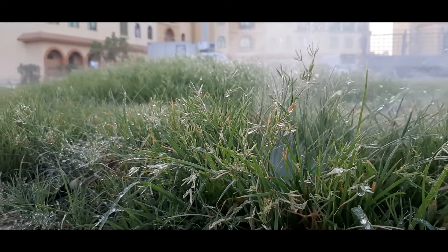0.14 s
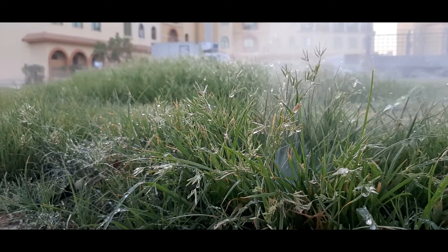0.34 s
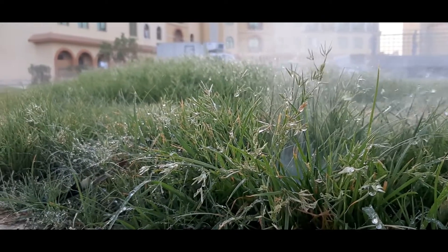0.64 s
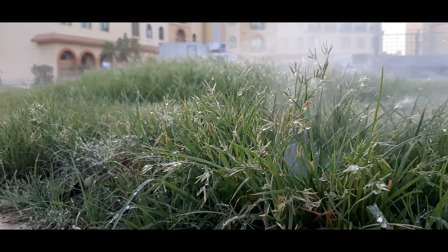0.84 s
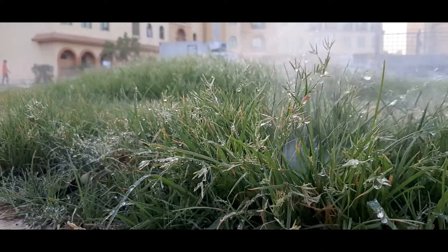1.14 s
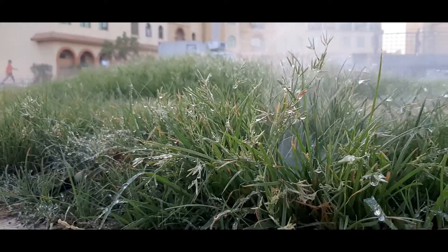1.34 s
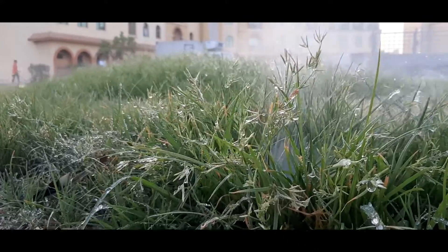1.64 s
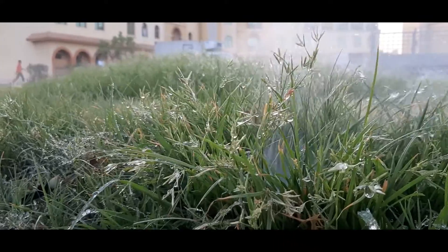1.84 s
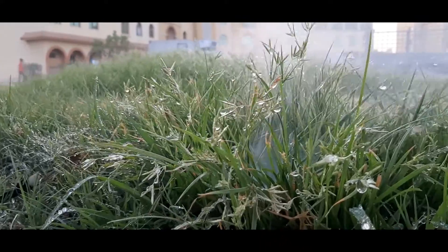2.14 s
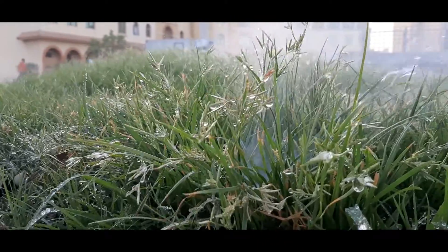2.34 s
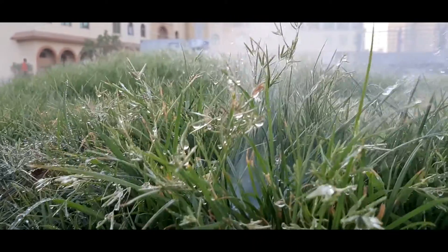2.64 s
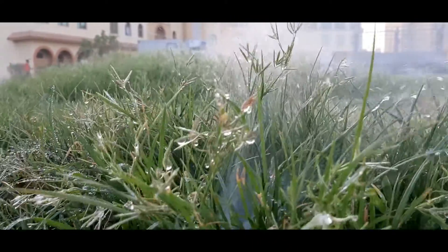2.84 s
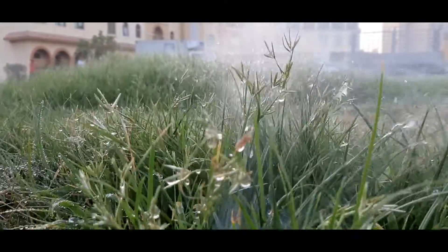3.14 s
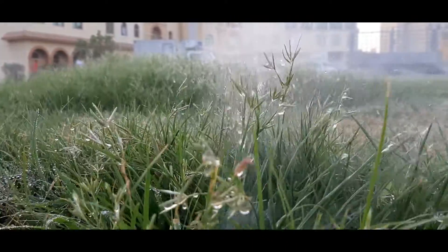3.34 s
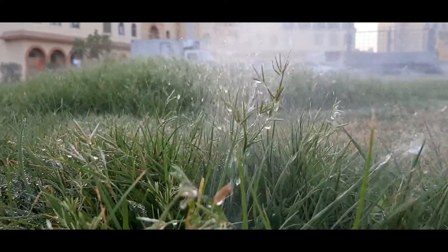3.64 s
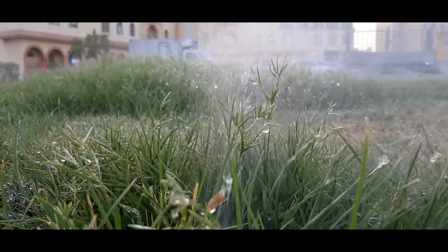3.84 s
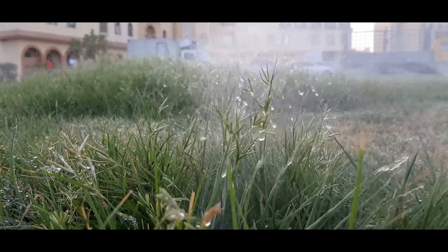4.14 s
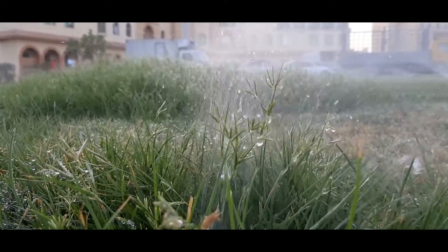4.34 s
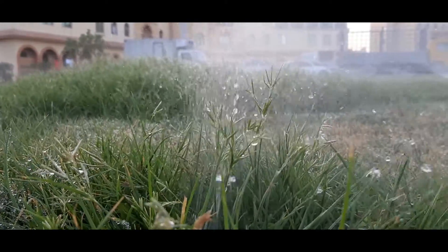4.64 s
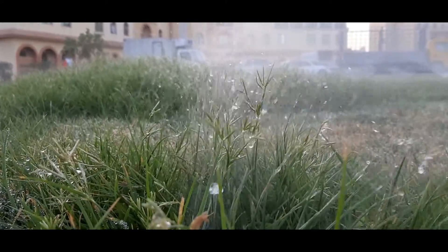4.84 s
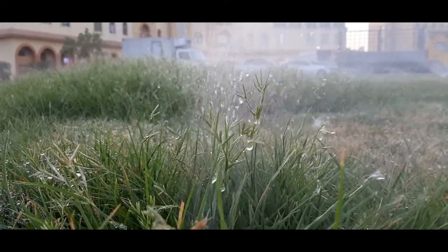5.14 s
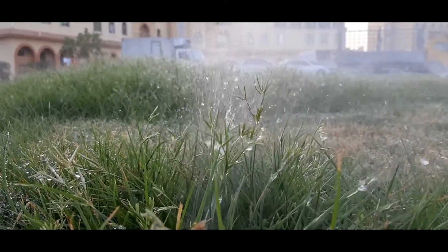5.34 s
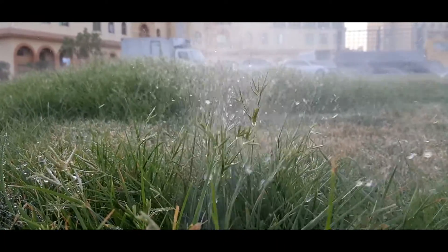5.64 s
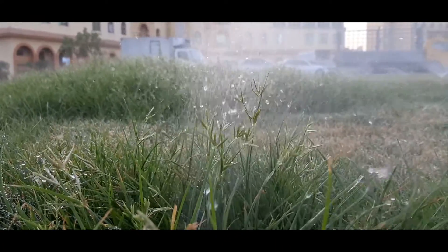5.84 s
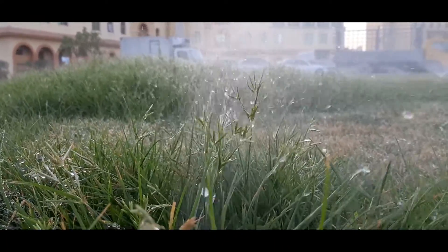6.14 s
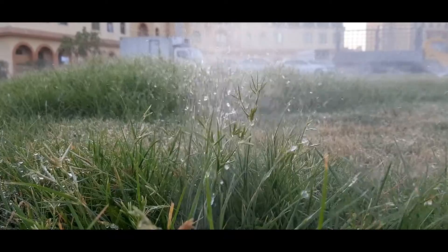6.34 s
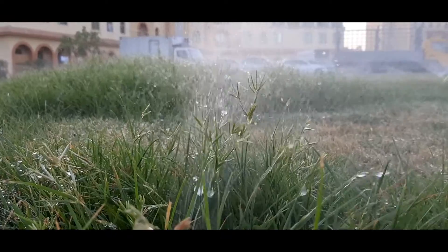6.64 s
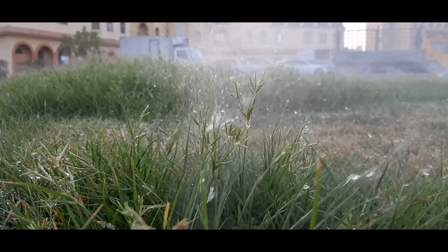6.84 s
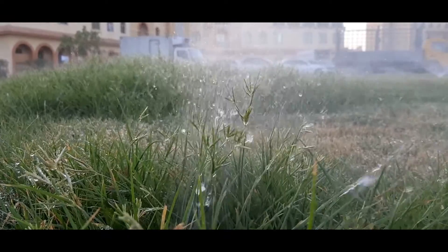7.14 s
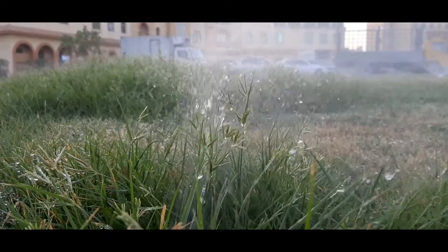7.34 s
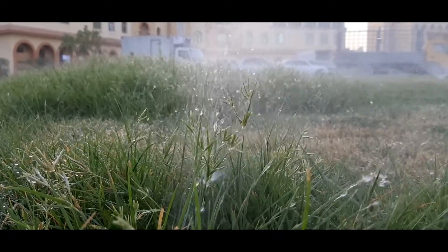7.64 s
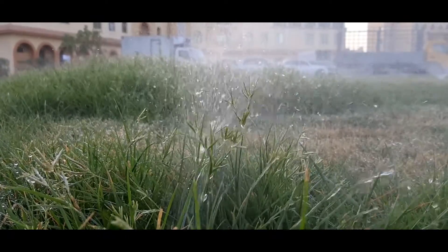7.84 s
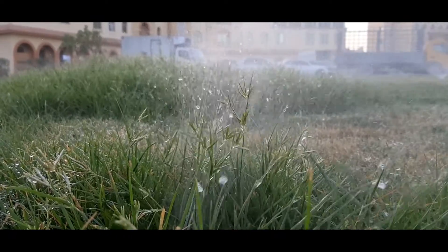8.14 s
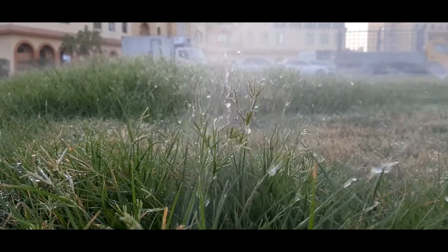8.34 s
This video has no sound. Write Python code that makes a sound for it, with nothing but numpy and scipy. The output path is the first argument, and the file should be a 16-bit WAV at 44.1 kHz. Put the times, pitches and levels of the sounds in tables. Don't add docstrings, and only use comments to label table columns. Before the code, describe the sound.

A lawn sprinkler hisses steadily over long grass, growing brighter and shriller, above low traffic rumble while a distant bird chirps harshly in two series.

```python
import sys
import numpy as np
from scipy import signal
from scipy.io import wavfile
from scipy.ndimage import uniform_filter1d

SR = 44100
rng = np.random.default_rng(int(sys.argv[2]) if len(sys.argv) > 2 else 0)


def gain_from_decibels(decibels):
    exponent = np.asarray(decibels, float) / 20
    return 10 ** exponent


def wrap_up_sound(samples):
    columns = np.atleast_2d(samples).T
    tamed = np.clip(columns, -1, 1)
    steps = np.round(tamed * 32767).astype(np.int16)
    wavfile.write(sys.argv[1], SR, steps)


N = 373968


def evened(x):
    return x / np.sqrt(np.mean(np.abs(x) ** 2) + 1e-20)


def read(points, hz):
    f, value = np.transpose(points)
    return np.interp(np.log(hz + 1), np.log(f + 1), value)[:, None]


def bumps(rows, hz):
    return sum(db * np.exp(-.5 * ((hz - f) / width) ** 2) for f, width, db in rows)[:, None]


def pair(a, b, same):
    same = np.clip(same, 0, 1)
    return np.array([a, same * a + np.sqrt(1 - same ** 2) * b])


def ease(t, middle, length):
    return 1 / (1 + np.exp(-(t - middle) / length))


def wander(t, low_hz, high_hz):
    rates_hz = np.geomspace(low_hz, high_hz, 24)
    return evened(sum(np.sin(2 * np.pi * (f * t + rng.random())) / np.sqrt(f) for f in rates_hz))


def patchy(chance, bins, frames):
    return evened(uniform_filter1d(uniform_filter1d(chance, size=bins, axis=0), size=frames, axis=1))


def deep(level_db=-60.5, nearing_db_per_s=1.85, top_hz=58):
    lowpass = signal.butter(4, top_hz, fs=SR, output="sos")
    a, b = signal.sosfilt(lowpass, rng.standard_normal((2, N)))
    return evened(pair(a, b, .8)) * gain_from_decibels(level_db + nearing_db_per_s * np.arange(N) / SR)


def town(level_db=-40, nearing_db_per_s=-0.05, lumps_db=0.63, patchy_db=3.0, hum_swell_db_per_s=0.26,
         balance_db=-1.5):
    # (frequency [Hz], level [dB])
    rumble_db = [(12, -61), (20, -54), (50, -3.5), (97, -6), (144, -8), (192, -8.5), (264, -16), (330, -13),
                 (476, -17), (900, -22.5), (1170, -48), (1980, -120)]
    # (frequency [Hz], likeness [-1 to 1])
    likeness = [(60, 0.88), (180, 0.64), (550, 0.59), (1650, -0.56), (4970, 0.17), (15000, -0.04)]
    # (frequency [Hz], width [Hz], level [dB])
    hums = [
        (98.6, 24, -43),
        (194.5, 4, -53),
        (1518, 50, -55.5),
    ]
    hz, t, (a, b) = signal.stft(rng.standard_normal((2, N)), SR, nperseg=4096, noverlap=3072)
    patches = patchy(rng.standard_normal((len(t), len(hz))).T, 7, 5)
    z = pair(a, b, read(likeness, hz)) * gain_from_decibels(read(rumble_db, hz) + patchy_db * patches)
    rumble = evened(signal.istft(z, SR, nperseg=4096, noverlap=3072)[1][:, :N])
    time_s = np.arange(N) / SR
    clock_s = np.arange(0, N, 64) / SR
    swell_db = level_db + nearing_db_per_s * clock_s + lumps_db * wander(clock_s, 0.392, 9.0)
    rumble = rumble * gain_from_decibels(np.interp(time_s, clock_s, swell_db))
    for f, width, db in hums:
        r = np.exp(-np.pi * width / SR)
        resonance = [1, -2 * r * np.cos(2 * np.pi * f / SR), r * r]
        wavering = signal.lfilter([1], resonance, rng.standard_normal(N))
        rumble = rumble + gain_from_decibels(db + hum_swell_db_per_s * time_s) * evened(wavering)
    return rumble * gain_from_decibels(np.array([[.5], [-.5]]) * balance_db)


def bird(warble_hz=150, swing_hz=90, swing_per_fall=.2, depth=0.97, rasp=0.9, bend=2.6, right_db=-7.5,
         echo_db=-7.0):
    # (time [s], level [dB], start [Hz], end [Hz], length [s])
    chirps = [
        (2.468, -39.5, 3000, 2890, 0.096),
        (2.85, -41.5, 3110, 2820, 0.08),
        (3.27, -43, 2980, 2750, 0.1),
        (3.65, -42, 2900, 2710, 0.079),
        (4.06, -47.5, 2910, 2450, 0.076),
        (7.306, -42.5, 2980, 2100, 0.1),
        (7.689, -40.5, 2920, 2100, 0.084),
        (8.069, -39.5, 2840, 2220, 0.086),
        (8.407, -43, 3030, 2400, .09),
    ]
    out = np.zeros(N + SR)
    for s, db, start_hz, end_hz, length in chirps:
        t = np.arange(0, length, 1 / SR)
        beat = 2 * np.pi * warble_hz * t + rng.uniform(0, 2 * np.pi)
        roughness = evened(uniform_filter1d(rng.standard_normal(8192), size=90))[:len(t)]
        wobble = np.sin(beat) + rasp * roughness
        fall_hz = start_hz - end_hz
        pitch_hz = start_hz - fall_hz * (t / length) ** bend + (swing_hz + swing_per_fall * fall_hz) * wobble
        tone = np.sin(2 * np.pi * np.cumsum(pitch_hz) / SR) * (1 + depth * np.cos(beat))
        out[round(s * SR):][:len(t)] += gain_from_decibels(db) * evened(tone) * np.sin(np.pi * t / length) ** 0.26
    wall = rng.standard_normal((2, 4000)) * np.exp(-np.arange(4000) / 900)
    echo = signal.oaconvolve(out[None, :N], wall / np.linalg.norm(wall[0]), axes=1)[:, :N]
    return (out[:N] + gain_from_decibels(echo_db) * echo) * gain_from_decibels(np.array([[0], [right_db]]))


def camera(t, rest_ms, turn_ms=.19, turn_s=1.2, settle_s=1.3, facing_rest=0.064):
    # (time [s], length [s], share [0-1])
    glances = [
        (1.793, 0.33, 0.56),
        (3.13, .42, 0.8),
        (5.8, .5, 0.1),
    ]
    lead_ms = rest_ms + turn_ms * (1 - np.exp(-np.maximum(t - turn_s, 0) / settle_s))
    facing = facing_rest + sum(share * np.exp(-.5 * ((t - s) / length) ** 2) for s, length, share in glances)
    height = ease(t, 2.75, 0.23)
    tilt = ease(t, 7.0, 0.13)
    return height, lead_ms, facing, tilt


def droplets(per_s=9000, spread_db=2.5, ticks_db=-5.0):
    hit, size = rng.random(N), rng.exponential(1, N)
    sign, smooth = rng.standard_normal(N), rng.standard_normal(N)
    ticks = (hit < per_s / SR) * np.sign(sign) * gain_from_decibels(spread_db * np.minimum(size, 5))
    return evened(smooth + gain_from_decibels(ticks_db) * evened(ticks))


def spray(level_db=20.5, flow_db=-37.5, surge_db=0.14, patchy_db=0.86, sputter_db=0.7, fade_hz=600,
          pocket_share=3.2, pocket_hz=1800, rest_ms=.007, notch_fade_ms=.08):
    # (frequency [Hz], density [dB per Hz])
    left_port = [(520, -12), (1210, -15.5), (1520, -14), (2070, -18), (3450, -15.5), (4310, -15.5),
                 (5860, -3), (6400, -8.5), (7920, -7), (8440, -13), (10300, -13), (12400, -3.5),
                 (14900, -9.5), (15800, -9.5)]
    right_port = [(520, -20.5), (1600, -10), (2500, -18), (3300, -16), (4650, -1.5), (5600, 1),
                  (6720, -3.5), (7580, -11), (8500, -29.5), (9990, -19.5), (11710, -10.5), (12920, -25),
                  (14300, -16.5), (15800, -19.5)]
    # (frequency [Hz], gain [dB])
    grass_left = [(520, -3), (1720, -1), (2760, 3.5), (4480, -4.5), (4870, -2), (5300, -13), (6370, -10),
                  (9650, -0.5), (10900, 0.5), (14470, -2.5)]
    grass_right = [(520, 1), (1900, -2), (2300, 3.5), (2930, 3.5), (4820, -9), (7580, -4.5), (9000, -0.5),
                   (10850, -2), (12400, 0.5), (15500, -0.5)]
    # (frequency [Hz], likeness [0-1])
    same_raised = [(520, .55), (1450, .74), (1900, .6), (2150, .12), (2900, .25), (3900, .68), (4350, .45),
                   (5650, .82), (7100, .62), (8100, .07), (11900, .3), (15500, .1)]
    same_low = [(520, .6), (1500, .72), (2300, .42), (2750, .85), (3100, .6), (4100, .58), (4900, .15),
                (6700, .28), (7600, .06), (15500, .1)]
    # (frequency [Hz], phase [rad])
    case_turn = [(300, .2), (800, .5), (2000, .5), (3300, 1), (4100, 1.5), (5000, .3), (5900, -.3),
                 (6400, .2), (7100, -.9), (7900, -.7)]
    # (frequency [Hz], width [Hz], gain [dB])
    left_dips = [(2205, 29, 0), (3845, 260, 5.5), (11000, 280, -1), (16000, 230, 0)]
    right_dips = [(2470, 70, -0.5), (6300, 150, -0.5), (6740, 250, 3), (13600, 280, 4.5), (13800, 200, -4),
                  (15200, 310, -3)]
    # (frequency [Hz], width [Hz], gain [dB])
    mist = [(7140, 700, 7), (10970, 200, 8.5), (15100, 570, 2.5)]
    # (frequency [Hz], width [Hz], gain [dB])
    tilt_gain = [(2100, 150, 5.4), (5350, 310, 2)]
    # (frequency [Hz], width [Hz], gain [dB])
    ground_notch = [(2324, 48, -16), (2590, 40, -10.5), (3340, 33, -4.5)]
    hz, t, near = signal.stft(droplets(), SR, nperseg=1024, noverlap=768)
    scattered = signal.stft(droplets(), SR, nperseg=1024, noverlap=768)[2]
    height, lead_ms, facing, tilt = camera(t, rest_ms)
    low = 1 - height
    z = pair(near, scattered, read(same_raised, hz) * height + read(same_low, hz) * low)
    lag_rad = 2 * np.pi * hz[:, None] * lead_ms / 1000
    z[1] *= np.exp(1j * (read(case_turn, hz) * height - lag_rad))
    left_db = read(left_port, hz) + read(grass_left, hz) * low
    left_db = left_db + bumps(left_dips, hz) + bumps(mist, hz) * facing
    right_db = read(right_port, hz) + read(grass_right, hz) * low
    right_db = right_db + bumps(right_dips, hz) + bumps(tilt_gain, hz) * tilt
    z *= gain_from_decibels(bumps(ground_notch, hz) * low * np.exp((rest_ms - lead_ms) / notch_fade_ms))
    chance = rng.standard_normal((len(t), len(hz) + 1)).T
    patches = patchy(chance[1:], 12, 10)
    pockets = patchy(chance[:0:-1], 2, 24)
    patches = patches + pocket_share / (1 + (hz[:, None] / pocket_hz) ** 4) * pockets
    sputter = evened(uniform_filter1d(chance[0], size=3)) * np.clip(hz / 5000, 0, 1)[:, None]
    pressure_db = flow_db + surge_db * wander(t, .3, 6.0)
    z *= gain_from_decibels(np.array([left_db, right_db]) + patchy_db * patches + sputter_db * sputter + pressure_db)
    z *= (1 / (1 + (fade_hz / (hz + 1)) ** 4))[:, None]
    return gain_from_decibels(level_db) * signal.istft(z, SR, nperseg=1024, noverlap=768)[1][:, :N]


def scene():
    return deep() + town() + bird() + spray()


def roll_off(x):
    return signal.sosfilt(signal.butter(12, 16890, fs=SR, output="sos"), x)


def record(dry, cut_hz=38):
    heard = signal.sosfilt(signal.butter(3, cut_hz, "high", fs=SR, output="sos"), dry)
    return roll_off(heard)


dry = scene()
out = record(dry)
wrap_up_sound(out)
```